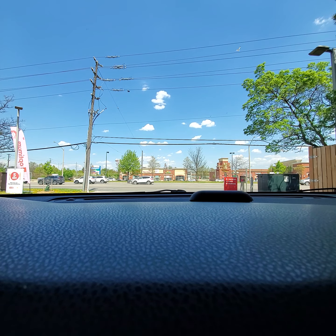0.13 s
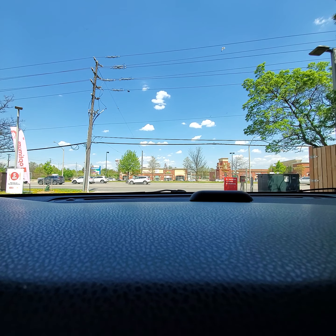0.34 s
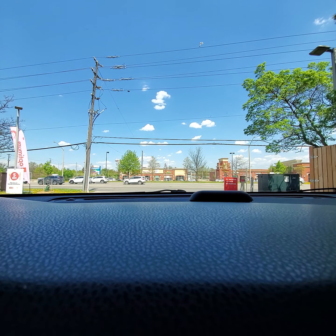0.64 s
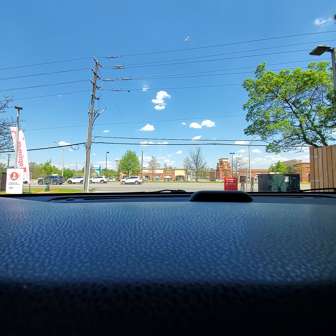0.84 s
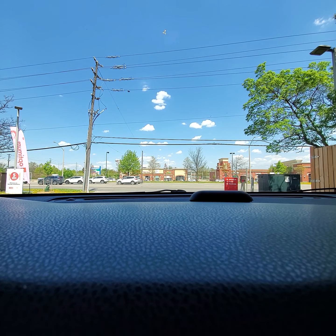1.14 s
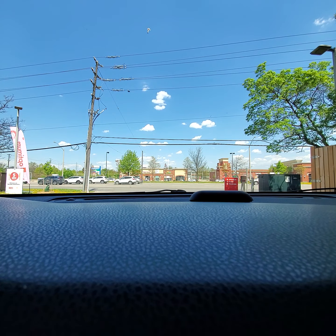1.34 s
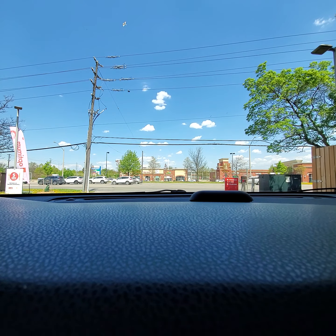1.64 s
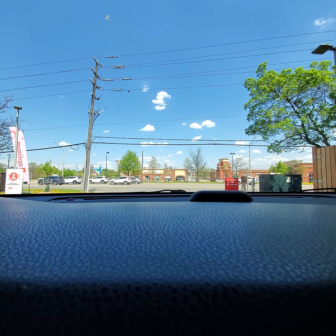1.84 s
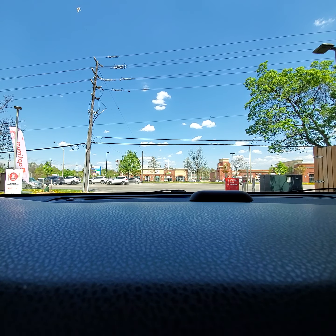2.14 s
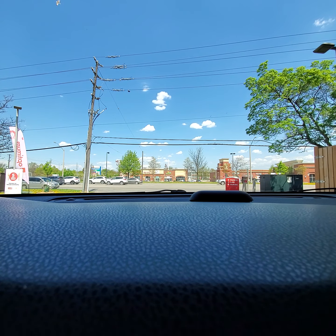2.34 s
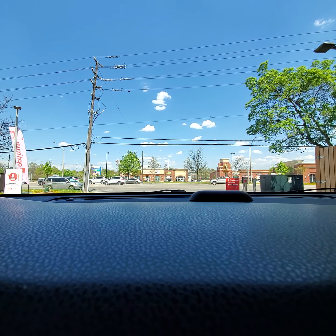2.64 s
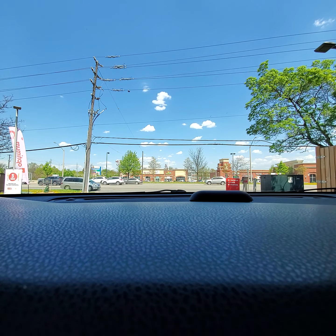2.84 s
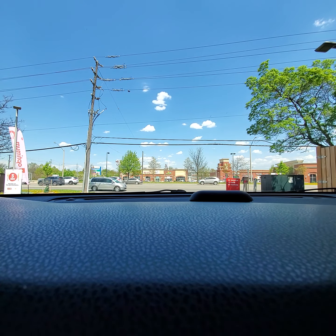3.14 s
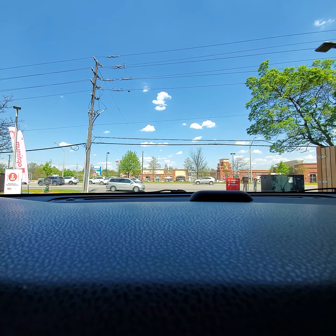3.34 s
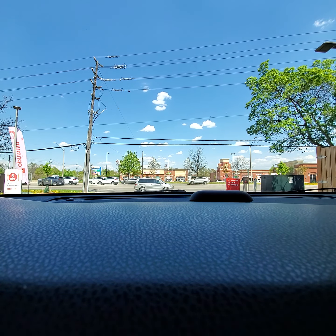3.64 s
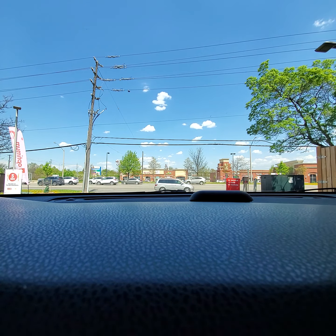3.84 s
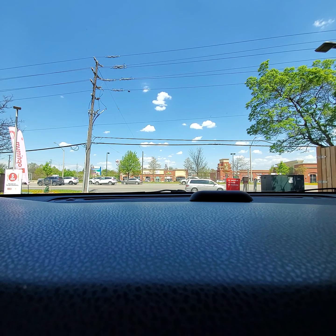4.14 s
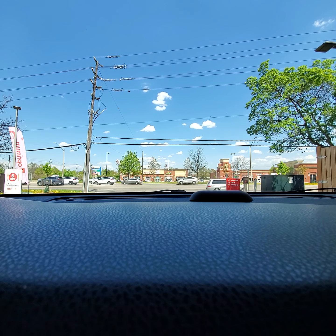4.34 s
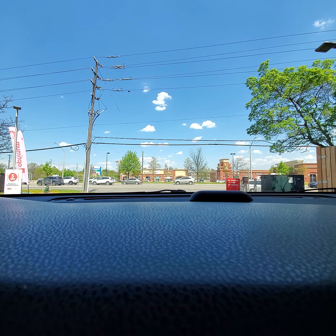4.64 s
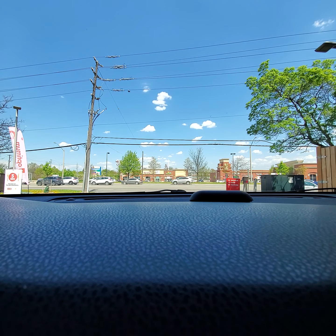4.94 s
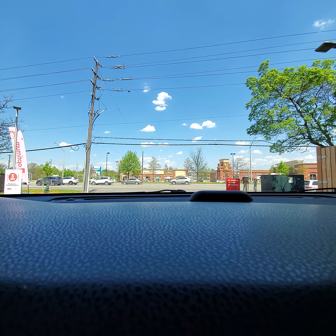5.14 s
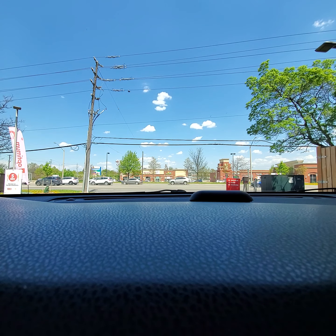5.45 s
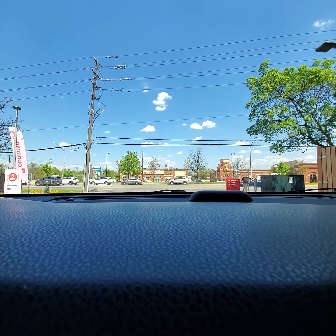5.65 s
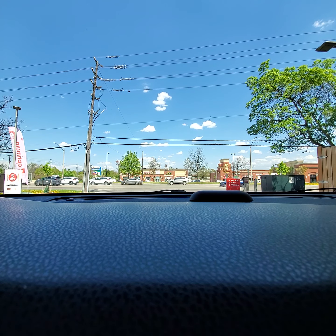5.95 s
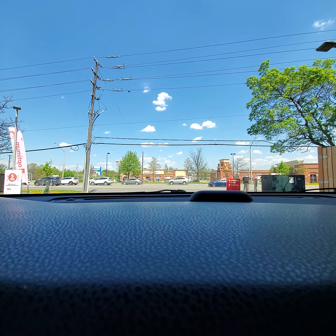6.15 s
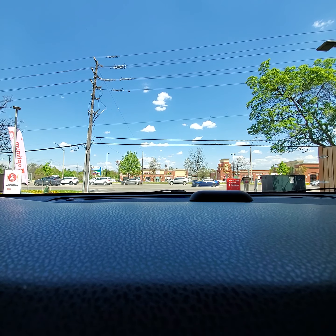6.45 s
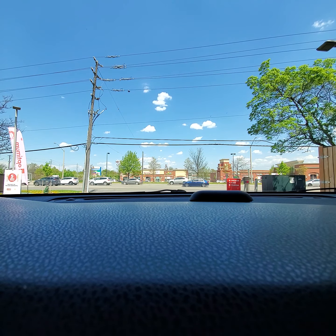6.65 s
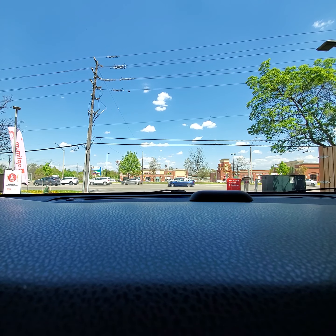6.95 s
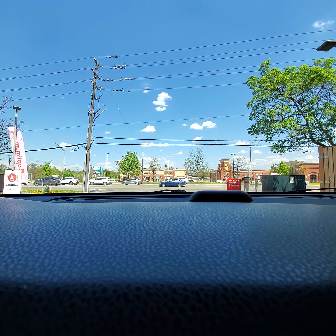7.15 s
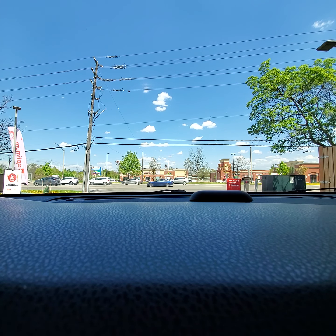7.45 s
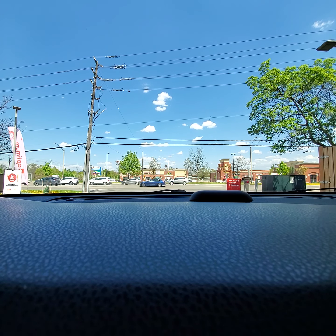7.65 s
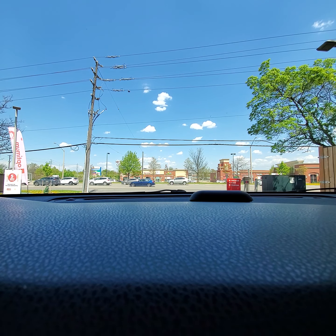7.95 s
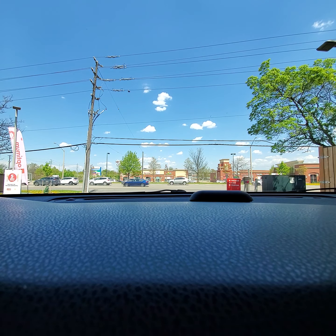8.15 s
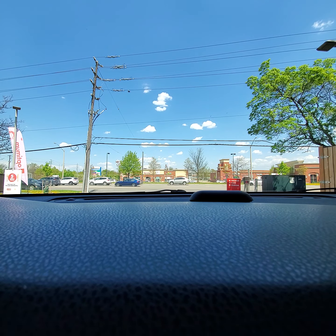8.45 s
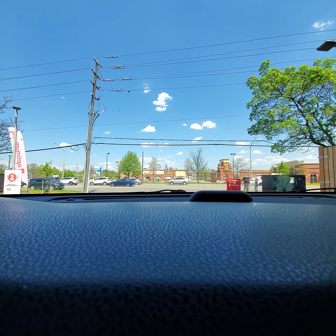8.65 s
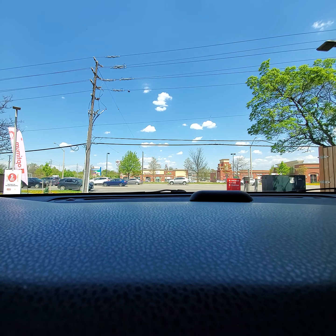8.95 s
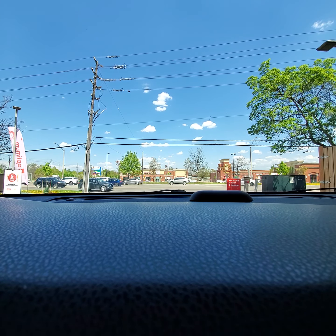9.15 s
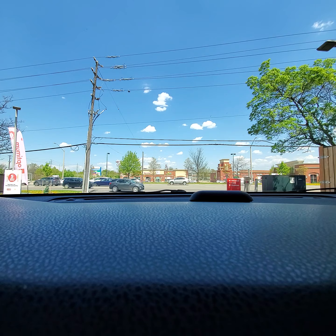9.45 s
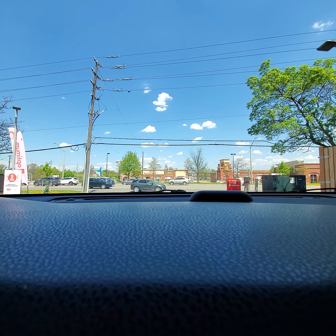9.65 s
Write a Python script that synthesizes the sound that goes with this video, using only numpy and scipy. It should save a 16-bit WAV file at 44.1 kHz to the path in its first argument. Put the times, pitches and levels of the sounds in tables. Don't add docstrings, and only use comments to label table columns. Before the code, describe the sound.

Heavy, throbbing low boom inside a closed car as powerful air dryers blow on the roof, with muffled roar and faint hissing at the seals.

```python
import sys
import numpy as np
from scipy import signal
from scipy.fft import rfft, irfft, next_fast_len
from scipy.io import wavfile
from scipy.ndimage import uniform_filter1d

SR = 44100
rng = np.random.default_rng(int(sys.argv[2]) if len(sys.argv) > 2 else 0)


def natural_amplitude(level_db):
    exponent = np.asarray(level_db, float) / 20
    return 10 ** exponent


def dump(signal):
    limited = np.clip(np.atleast_2d(signal).T, -1, 1)
    pcm = np.round(limited * 32767).astype(np.int16)
    wavfile.write(sys.argv[1], SR, pcm)


N = 433062


def cabin():
    return lowest_modes() + cross_modes() + height_modes()


# (centre [Hz], width [Hz], level [dB])
LOWEST_MODES = [
    (51.7, 16, 3.5),
    (64.1, 12.8, 0.5),
    (81, 21, -8.5),
]
# (time [s], change [dB], length [s])
LOWEST_GUSTS = [(0.13, 3.5, 0.2), (0.34, -5.0, 0.093), (0.61, -11, 0.04), (1.0, -5, 0.07),
                (1.13, -5.5, 0.045), (1.74, -4, 0.33), (1.87, 6.5, 0.08), (2.08, 7, 0.05),
                (2.16, -9.0, 0.07), (2.61, 5, 0.045), (3.17, 3, 0.07), (3.37, -6.5, 0.056),
                (3.53, -1.5, 0.087), (3.66, 6.0, 0.07), (3.92, 4, 0.05), (4.57, -11, 0.04),
                (4.74, 5.5, 0.13), (5.03, -4, 0.09), (5.26, -3, 0.5), (5.64, -4.0, 0.05), (5.72, 9.5, 0.07),
                (5.79, -4, 0.26), (6.07, 4, 0.26), (6.57, -4.5, 0.25), (7.36, 8, 0.04), (8.09, 2.0, 0.61),
                (8.39, -6.5, 0.06), (8.64, -7.5, 0.12), (8.77, 3, 0.23), (9.38, 5, 0.082)]


def lowest_modes():
    boom = air(modes(LOWEST_MODES, steep=1.805), patchy_db=0.0)
    return natural_amplitude(-14.5 + gusts(LOWEST_GUSTS)) * steadied(boom, seconds=0.1, firm=0.7)


# (centre [Hz], width [Hz], level [dB])
ACROSS_MODES = [
    (99, 13, -4.5),
    (121.6, 33.5, 1.5),
]
# (time [s], change [dB], length [s])
ACROSS_GUSTS = [(0.32, 4.5, 0.12), (0.56, -3.5, 0.5), (1.26, -1, 0.24), (1.7, 6.5, 0.098),
                (2.01, -5.5, 0.08), (3.14, -4.5, 0.12), (3.9, 2.5, 0.47), (4.54, 3.0, 0.17),
                (5.38, 4, 0.06), (5.45, -2.5, 0.04), (5.75, -5.5, 0.06), (7.07, -14, 0.07),
                (7.21, 3.5, 0.5), (7.8, 5, 0.061), (8.21, -9.5, 0.17), (8.34, -5.5, 0.05),
                (8.59, 2.5, 0.52), (8.93, 4.5, 0.06)]


def cross_modes():
    cross = air(modes(ACROSS_MODES, steep=1.54), patchy_db=-0.5)
    return natural_amplitude(-26 + gusts(ACROSS_GUSTS)) * steadied(cross, seconds=0.13, firm=0.6)


# (centre [Hz], width [Hz], level [dB])
HEIGHT_MODES = [
    (169.2, 30, -3),
    (187.4, 38, -1.5),
    (201, 10, -10.5),
]
# (time [s], change [dB], length [s])
HEIGHT_GUSTS = [(0.04, 5, 0.08), (1.11, -9.5, 0.07), (1.44, 6, 0.12), (1.88, -7.5, 0.057),
                (2.2, -11.5, 0.09), (2.84, -4, 0.11), (3.6, -6.5, 0.11), (3.88, 3.0, 0.5), (4.04, -6, 0.1),
                (4.64, 4.0, 0.065), (4.74, -3, 0.05), (6.44, -3.5, 0.06), (6.62, 5.0, 0.11),
                (6.91, 4, 0.088), (7.7, -4.5, 0.081), (8.62, 2.5, 0.3), (9.07, 3.5, 0.23),
                (9.56, 10, 0.034)]


def height_modes():
    high = air(modes(HEIGHT_MODES, steep=1.77), patchy_db=-2.2)
    return natural_amplitude(-26 + gusts(HEIGHT_GUSTS)) * steadied(high, seconds=0.1, firm=0.7)


# (time [s], nearness [0-1], leak past the seals [dB])
NOZZLE = [(0, 1, -46), (.2, 0.77, -48), (.6, .5, -48), (.95, .8, -48.5), (1.2, 0.22, -48.5),
          (1.4, 0.7, -46.5), (1.7, 0.64, -46), (2.3, .35, -46), (2.9, -.1, -46), (3.6, 0.1, -45.5),
          (5.1, 0.12, -45.5), (5.5, 0, -45.5), (7, 0.07, -45.5), (9, 0.02, -45), (9.4, 0, -45),
          (9.75, 0, -46)]


def blowers():
    near, leak_db = curves(NOZZLE)
    return roar(near) + hiss(leak_db) + blade_tone(leak_db) + seal_whistles(leak_db)


# (frequency [Hz], density [dB per Hz])
PANEL_PASS = [(130, -33), (225, -7), (238, -8.5), (275, -2.5), (357, -1.5), (395, -6), (482, -2.5),
              (532, -5.5), (560, -9), (646, -10.5), (814, -16), (1000, -27), (1300, -53), (2200, -120)]


def roar(near):
    upper = lambda hz: 1 / (1 + (540 / (hz + 1)) ** 12)
    panels = lambda hz: natural_amplitude(along(PANEL_PASS, hz))
    body = air(lambda hz: panels(hz) * np.sqrt(1 - upper(hz)), patchy_db=-0.2)
    edge = air(lambda hz: panels(hz) * np.sqrt(upper(hz)), patchy_db=0.7)
    body = steadied(body, seconds=0.1, firm=0.65)
    return natural_amplitude(-28.5 + 4.5 * near) * body + natural_amplitude(-39 + 7 * near) * edge


# (frequency [Hz], density [dB per Hz])
SEAL_HISS = [(470, -25.5), (800, -2.5), (917, -4), (1090, -2), (1220, -4.5), (1330, -3), (1450, -8),
             (1840, -9.5), (3340, -14), (4340, -17.5), (6300, -25), (8390, -40), (13300, -43), (15600, -46)]


def hiss(leak_db):
    return natural_amplitude(leak_db + 5.0) * air(lambda hz: natural_amplitude(along(SEAL_HISS, hz)), patchy_db=0.5)


BLADE_PITCHES = [
    480,
    523,
    1046,
]
# (width [Hz], level [dB], left-right [dB])
BLADE_TONES = [
    (30, -43, 0),
    (10, -45, 1),
    (5, -67, 8),
]


def blade_tone(leak_db):
    return natural_amplitude(leak_db + 47.5) * whistles(BLADE_PITCHES, BLADE_TONES)


GAP_PITCHES = [2095, 4585, 1120, 1550, 2452, 2824, 3285, 3600, 5605, 6170, 6755, 7000, 7290, 7950, 8630,
               9288, 9950, 11440, 12170, 13750]
# (width [Hz], level [dB], left-right [dB], left lead [rad])
GAP_TONES = [(50, -69, -2, 1), (70, -72.5, -2, 1.1), (50, -63, -1.5, 0.9), (80, -63, -3, 1.5),
             (40, -67.5, -2.5, 1), (50, -65.5, -5, 1), (80, -67, -2.5, 0.93), (300, -65.5, -7, 1.5),
             (140, -70, -11.5, 2), (200, -74.5, -11.5, 1), (130, -80, -6.5, 1.8), (200, -81, -6, 1.4),
             (200, -82, -5.5, 1), (200, -85.5, 4, 1.5), (160, -88, -6.5, 1.5), (160, -87.5, -0.5, .3),
             (220, -91.5, 6, 1.7), (170, -90, -0.5, 1), (170, -90, -3.5, 1), (150, -95, -5.5, 2)]


def seal_whistles(leak_db):
    return natural_amplitude(leak_db + 49.5) * whistles(GAP_PITCHES, GAP_TONES)


# (time [s], level [dB])
VENT_DRAUGHT = [(0, -56), (1, -56.5), (1.3, -58), (1.7, -54.5), (1.76, -59.5), (3, -60.5), (7, -61.5),
                (9.8, -61.5)]
SLAT_PITCHES = [4085, 4200, 4600, 5200]
# (width [Hz], level [dB], left-right [dB], left lead [rad])
SLAT_TONES = [
    (90, -1, -1, 2.2),
    (100, 0.5, 1, 2.8),
    (80, -8, -1.5, 2.9),
    (120, -11.5, 1.5, 2.9),
]


def vent():
    draught_db = curves(VENT_DRAUGHT)[0]
    slats = natural_amplitude(draught_db) * whistles(SLAT_PITCHES, SLAT_TONES)
    rush = air(lambda hz: resonance(hz, 3750, 1300) ** 2, patchy_db=0.0)
    return slats + natural_amplitude(-60 + 1.6 * (draught_db + 61)) * rush


def trim_clip():
    t = np.arange(SR // 40) / SR
    ring = natural_amplitude(-60 * t / 0.013) * (1 - np.exp(-t / 0.001))
    rattle = np.zeros(N)
    for s, hz, db in chatter():
        rattle[round(s * SR):][:len(t)] += natural_amplitude(db + 9.5) * ring * np.sin(2 * np.pi * hz * t)
    return rattle * natural_amplitude([[-6], [4]])


CLIP_BOUTS = [(.113, .01, -64), (1.461, .03, -68), (1.653, .03, -68), (2.49, .05, -68), (2.63, .06, -66),
              (2.735, .01, -68), (2.83, .05, -66), (3.75, .01, -66), (3.8, .07, -67), (3.912, .1, -67),
              (4.156, .01, -65), (4.333, .01, -67), (4.426, .01, -71), (5.283, .01, -67), (5.409, .03, -66),
              (5.548, .01, -70), (6.501, .01, -64), (6.543, .05, -65), (6.69, .06, -66), (6.797, .03, -67),
              (6.989, .05, -65), (7.928, .01, -67), (8.08, .1, -69), (8.262, .01, -62), (9.307, .03, -64),
              (9.383, .03, -68), (9.521, .01, -71)]


def chatter():
    gap_s, uneven_s = 0.021, 0.004
    clip_hz, spread_hz, spread_db = 13030, 70, 2.5
    s, length, db = np.transpose(CLIP_BOUTS)[:, :, None]
    late = gap_s * np.arange(6)
    dt, dhz, ddb = np.moveaxis(rng.standard_normal((len(CLIP_BOUTS), 6, 3)), 2, 0)
    live = late < length
    starts = s + late + uneven_s * dt * (late > 0)
    return zip(starts[live], (clip_hz + spread_hz * dhz)[live], (db + spread_db * ddb)[live])


# (time [s], peak level [dB])
GLASS_DROPS = [
    (5.0332, -58),
    (6.5, -67.5),
]


def drops():
    t = np.arange(SR // 40) / SR
    splash = rng.standard_normal((2, len(t))) * natural_amplitude(-60 * t / 0.02)
    hits = knocks(GLASS_DROPS, boost_db=6)[None]
    taps = signal.fftconvolve(hits, splash, axes=1)[:, :N]
    return filtered(taps, lambda hz: resonance(hz, 12000, 8000))


# (pitch [Hz], rms level [dB], left-right [dB])
WHINE_TONES = [
    (7832, -93, -14),
    (7892, -92.5, -14),
    (15724, -93, -10),
]


def whine():
    t = np.arange(N) / SR
    total = np.zeros((2, N))
    for hz, db, pan_db in WHINE_TONES:
        gains = sides(pan_db, 0).real[:, None]
        total += np.sqrt(2) * natural_amplitude(db) * gains * np.sin(2 * np.pi * hz * t)
    return total


def floor():
    shudder = natural_amplitude(-36) * air(lambda hz: resonance(hz, 38, 11) ** 2, patchy_db=-1.5)
    self_noise = unit(filtered(rng.standard_normal((2, N)), lambda hz: resonance(hz, 15000, 5000)))
    return shudder + natural_amplitude(-79) * self_noise


# (frequency [Hz], likeness [0-1])
MIC_LIKENESS = [(60, .997), (90, .99), (107, .9), (125, .985), (205, .99), (245, .5), (300, .92),
                (500, .84), (560, .72), (760, .68), (900, .3), (1300, .33), (1800, .12), (3500, .2),
                (5000, .35), (6000, .18), (15000, .1)]
# (frequency [Hz], phase [rad])
MIC_LEAD = [(50, -.07), (100, .04), (160, .15), (200, -.06), (250, -.4), (300, .3), (400, .45), (800, .6),
            (1300, 1.7), (2300, 1.1), (5000, 2.8), (9000, 6.1), (15000, 9.2)]
# (frequency [Hz], left-right [dB])
MIC_BALANCE = [(50, 0.3), (90, -2.5), (120, 2.5), (235, 3.5), (265, -2.5), (300, 2), (520, 0.7),
               (650, -2.5), (770, 4.5), (950, -5.5), (1300, 0.8), (1900, -2), (3500, -1), (6000, -2.5),
               (7300, -4), (8000, 4.5), (8700, -1), (10200, 2), (12000, -2.5), (15000, -1)]


def air(gain, patchy_db):
    z = signal.stft(rng.standard_normal((2, N)), nperseg=512)[2]
    field = uniform_filter1d(rng.standard_normal(z.shape[1:]), size=6, axis=0)
    field = uniform_filter1d(field, size=14, axis=1)
    a, b = signal.istft(z * natural_amplitude(patchy_db * unit(field)), nperseg=512)[1][:, :N]
    turn = lambda hz: np.arccos(np.clip(along(MIC_LIKENESS, hz), 0, 1)) / 2
    ears = lambda hz: gain(hz) * sides(along(MIC_BALANCE, hz), along(MIC_LEAD, hz))
    shared = filtered(a, lambda hz: ears(hz) * np.cos(turn(hz)))
    opposed = filtered(b, lambda hz: ears(hz) * np.sin(turn(hz)) * [[1], [-1]])
    return unit(shared + opposed)


def steadied(x, seconds, firm):
    span = int(seconds * SR)
    power = uniform_filter1d(uniform_filter1d(np.mean(x ** 2, 0), span), span)
    return unit(x / (np.abs(power) + 0.027) ** (np.clip(firm, 0, 1) / 2))


def gusts(rows):
    t = np.arange(0, N, 64) / SR
    db = np.zeros(len(t))
    for s, change_db, length in rows:
        db += change_db * np.exp(-4 * np.log(2) * ((t - s) / length) ** 2)
    return np.interp(np.arange(N) / SR, t, db)


def modes(table, steep):
    def gain(hz):
        power = sum(natural_amplitude(2 * db) * np.abs(resonance(hz, c, w)) ** (2 * steep) for c, w, db in table)
        return np.sqrt(power)
    return gain


def whistles(pitches_hz, rows):
    return sum(narrow(hz, *row) for hz, row in zip(pitches_hz, rows))


def narrow(hz, width_hz, db, pan_db, lead=0):
    gains = sides(pan_db, lead)[:, None]
    tone = filtered(rng.standard_normal(N), lambda f: resonance(f, hz, width_hz) ** 2 * gains)
    return natural_amplitude(db) * unit(tone)


def resonance(hz, centre_hz, width_hz):
    return 1j * hz * width_hz / (centre_hz ** 2 - hz ** 2 + 1j * hz * width_hz)


def sides(pan_db, lead):
    half = natural_amplitude(pan_db / 2) * np.exp(0.5j * lead)
    return np.array([half, 1 / half])


def knocks(events, boost_db):
    s, db = np.transpose(events)
    out = np.zeros(N)
    out[np.round(s * SR).astype(int)] = natural_amplitude(db + boost_db)
    return out


def filtered(x, response):
    m = next_fast_len(N + SR // 2)
    return irfft(rfft(x, m) * response(np.fft.rfftfreq(m, 1 / SR)), m)[..., :N]


def curves(rows):
    s, *cols = np.transpose(rows)
    return [np.interp(np.arange(N) / SR, s, c) for c in cols]


def along(points, hz):
    f, v = np.transpose(points)
    return np.interp(np.log(hz + 1), np.log(f + 1), v)


def unit(x):
    return x / np.sqrt(np.mean(x ** 2) + 1e-20)


def scene():
    return cabin() + blowers() + vent() + trim_clip() + drops() + whine() + floor()


def top_cut(x):
    return signal.sosfilt(signal.butter(12, 15780, fs=SR, output="sos"), x)


def record(dry):
    x = filtered(dry, lambda hz: 1 / np.sqrt(1 + (32 / (hz + 1)) ** 6))
    mix = x / (1 + np.abs(x / 1.05) ** 6) ** (1 / 6)
    return top_cut(mix)


dry = scene()
out = record(dry)
dump(out)
```